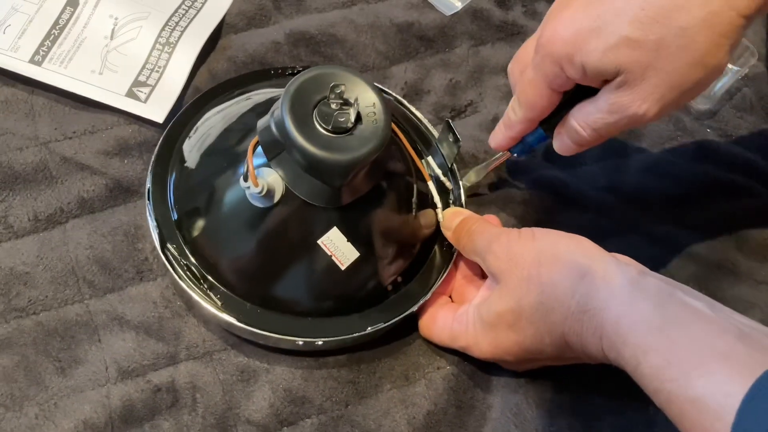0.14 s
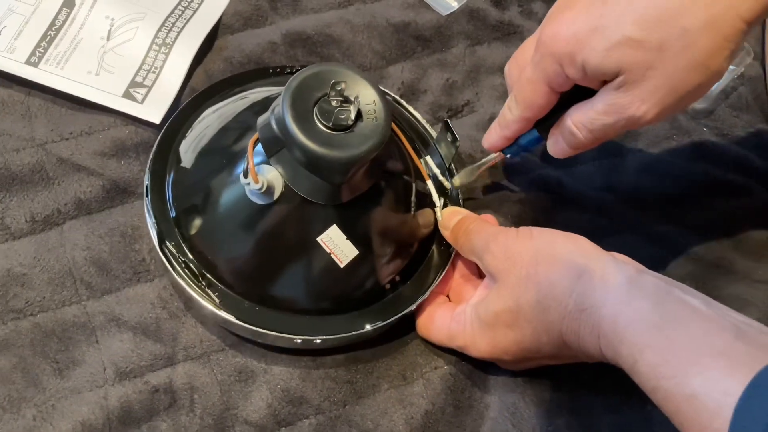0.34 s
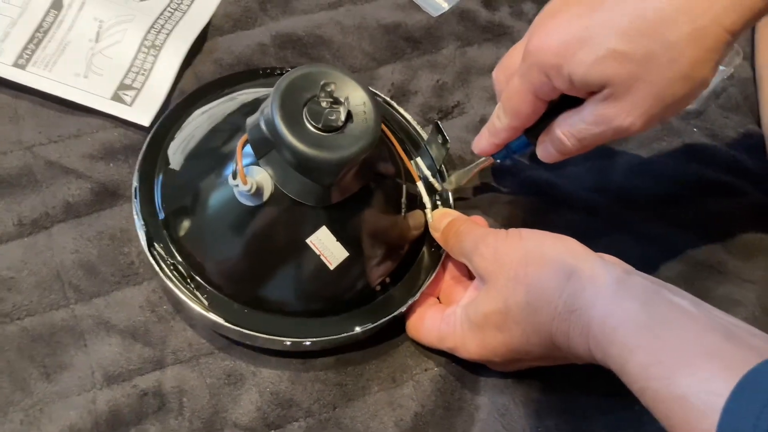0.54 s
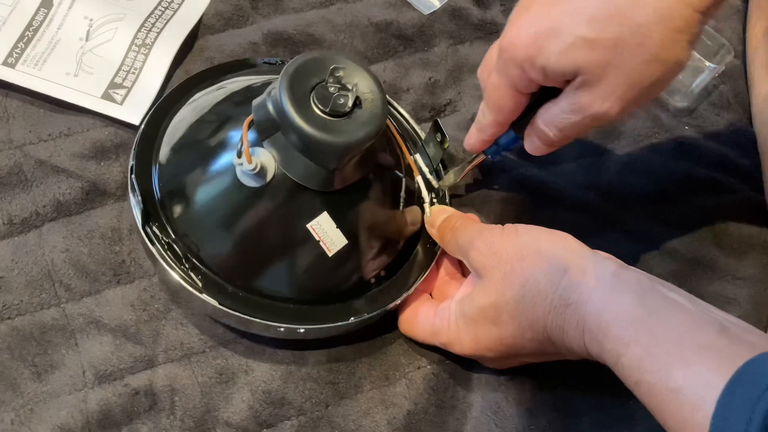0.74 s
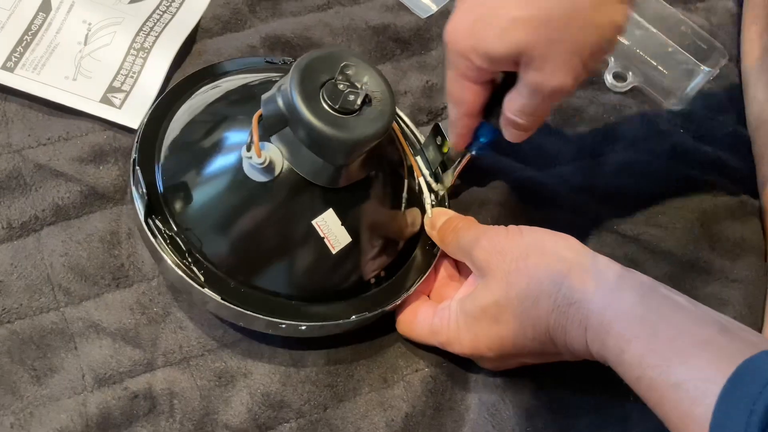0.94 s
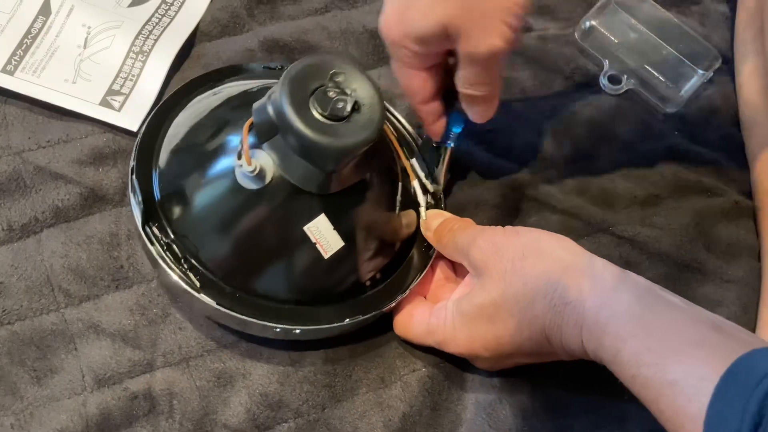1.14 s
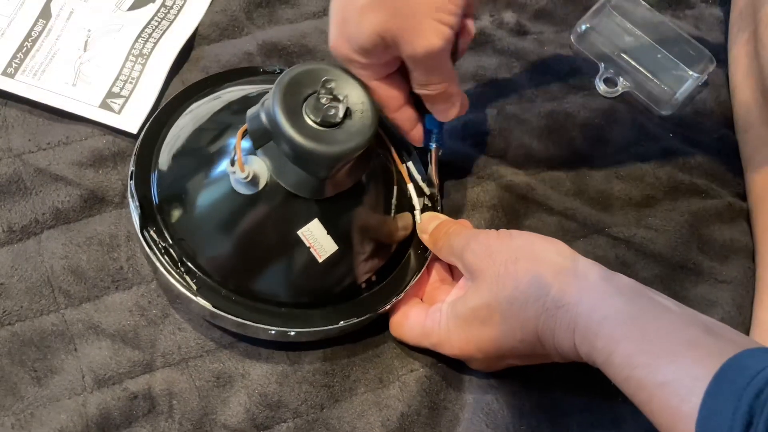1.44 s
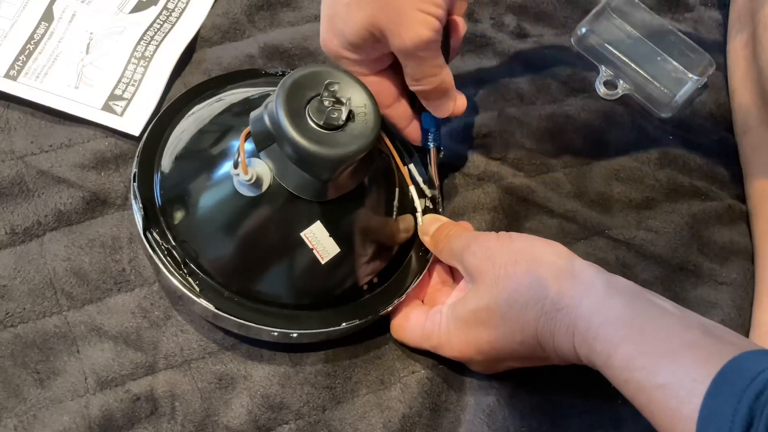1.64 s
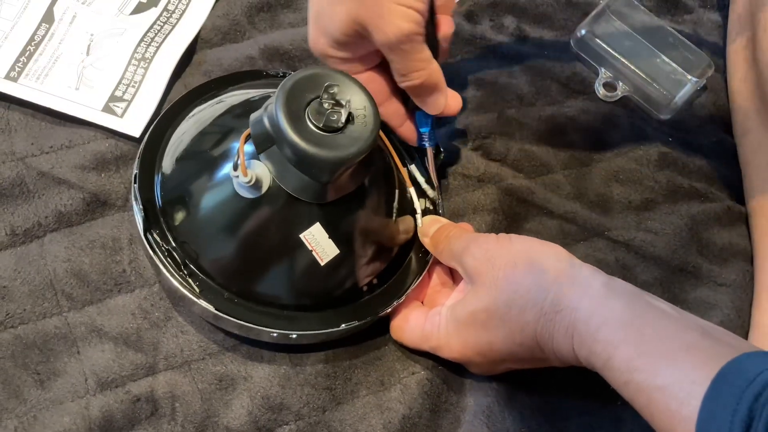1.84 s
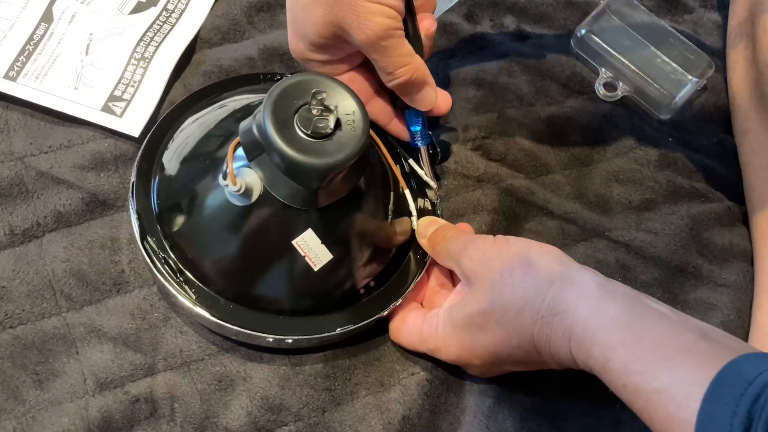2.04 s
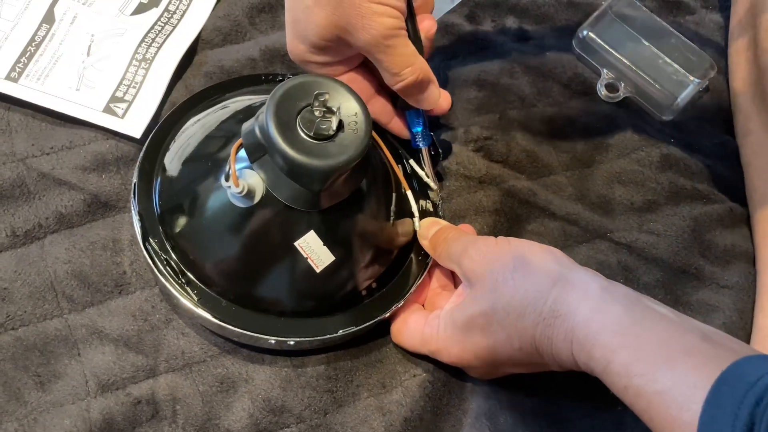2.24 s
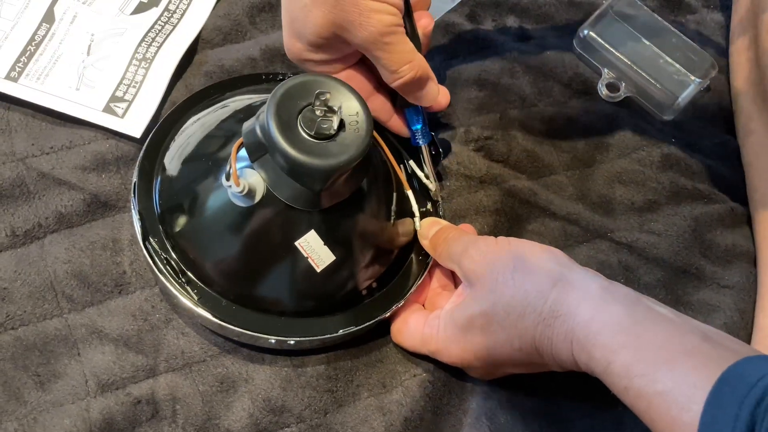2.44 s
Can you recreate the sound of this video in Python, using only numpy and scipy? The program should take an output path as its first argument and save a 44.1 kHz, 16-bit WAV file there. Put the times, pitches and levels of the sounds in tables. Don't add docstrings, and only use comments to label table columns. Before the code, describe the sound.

Thin metal tabs snap and tick under a screwdriver blade, with short gritty scrapes and dull knocks on a blanket; busy first, quieter later, one last weak cluster, heard close in stereo over low indoor hum.

```python
import sys
import numpy as np
from scipy import signal
from scipy.fft import rfft, irfft, next_fast_len
from scipy.io import wavfile
from scipy.ndimage import uniform_filter1d

SR = 44100
rng = np.random.default_rng(int(sys.argv[2]) if len(sys.argv) > 2 else 0)


def unload_audio(sound):
    columns = np.transpose(np.atleast_2d(sound))
    steps = np.round(np.clip(columns, -1, 1) * 32767)
    wavfile.write(sys.argv[1], SR, steps.astype(np.int16))


def gain_from_db(level_db):
    decades = np.asarray(level_db, float) / 20
    return 10 ** decades


N = 114660

# time_s, level_db
HUM_SWELL = [(0.0, -41.5), (0.03, -45), (0.43, -40), (0.51, -50.5), (0.74, -41.5), (0.94, -54),
             (1.1, -39.5), (1.16, -47.5), (1.4, -38.5), (1.59, -55.5), (1.64, -36.5), (1.71, -38.5),
             (1.73, -46.5), (2.03, -36.5), (2.19, -55.5), (2.35, -36.5), (2.45, -52), (2.6, -38.5)]
# pitch_hz, width_hz, level_db
HUM_MODES = [(84.5, 7.8, 2.5), (115.2, 25, -7)]
HUM_LEFT_DB = -1.5
# pitch_hz, level_db
AIR_COLOUR = [(25, -42), (50, -15.5), (160, -18.5), (220, -30), (480, -40), (620, -40), (1500, -50.5),
              (14500, -61.5)]
AIR_DB, AIR_TOP_HZ = -57.5, 15200
# pitch_hz, likeness_0_to_1
PORT_LIKENESS = [(60, .94), (250, .8), (700, .5), (2500, .6), (6300, .3), (8000, .995)]

# time_s, pressure_db
HANDLING = [(0.0, -62), (0.14, -54.5), (0.31, -51), (0.4, -56), (0.68, -60.5), (0.83, -62), (1.14, -56.5),
            (1.29, -66.5), (1.53, -65), (1.91, -59), (2.32, -64.5), (2.54, -61), (2.6, -58)]
# pitch_hz, level_db_per_hz
HANDLING_COLOUR = [(120, -22), (200, -4), (370, 0.5), (480, -1.5), (600, -17.5), (900, -14.5),
                   (1400, -33.5)]
HANDLING_DB, HANDLING_PATCHY_DB = 0, 2.5

# start_s, length_s, pressure_db, grit_treble_db
STROKES = [(0.001, 0.034, -56.5, 0), (0.016, 0.55, -57.5, -28), (0.208, 0.057, -31, -17),
           (0.24, .1, -66, 3), (0.383, 0.072, -43, 3), (0.429, 0.14, -48.5, 0.5), (0.89, 0.23, -39.5, -12),
           (1.008, 0.06, -70, -25), (1.102, .12, -45, -13.5), (1.218, 0.088, -62.5, -2.5),
           (1.557, 0.16, -65.5, -8), (1.693, 0.23, -71.5, -16), (1.841, 0.34, -60.5, -11),
           (2.255, 0.13, -52, -16), (2.287, 0.084, -46, -6), (2.455, 0.23, -53.5, -17.5)]
# pitch_hz, level_db
RUB_COLOUR = [(250, -42), (600, -4.5), (1500, -5), (2400, -1), (3500, -15.5), (4400, -16), (5300, -24),
              (7000, -41)]
# pitch_hz, level_db_per_hz
GRIT_COLOUR = [(3000, -24.5), (5500, -14.5), (8000, 2.5), (12000, -1), (15000, -15), (16500, -23)]
RUB_DB, RUB_PER_S, RUB_SIZE_DB, RUB_PATCHY_DB = -4.5, 6500, -4.5, 2.5
RUB_RING_DB, RUB_WIDTH_HZ = 1, 77

# start_s, length_s, pressure_db
SLIDES = [
    (1.57, 0.18, -60),
    (2.2, 0.2, -68.5),
    (2.2, 0.15, -58.5),
    (0.028, .12, -68),
]
# pitch_hz, level_db_per_hz
SLIDE_COLOUR = [(500, -20), (850, -0.5), (1100, -2.5), (1500, -3), (2000, 0.5), (2400, -11.5),
                (3200, -28.5)]
SLIDE_PATCHY_DB = 1.5

# start_s, level_db, dome_thud_db, treble_crack_db, rim_ping_db
SNAPS = [(0.1669, -24, -5.5, -8.5, -16), (0.2144, -28.5, -4.5, -10, -17), (0.2244, -30.5, -11, -0.5, -7.5),
         (0.2288, -26, -5.5, -8, -13), (0.39, -21, -4, 1, -11.5), (0.4237, -21.5, -4.5, -13.5, -19),
         (0.4305, -12, -9, -0.3, -6), (0.452, -26, -10.5, -2, -9.5), (0.5183, -21, -8.5, -1.5, -2.5),
         (1.0048, -9.5, -5, -15.5, -8), (1.079, -13, -12.5, -3, -8.5), (2.5049, -36.5, -8, -15, -42)]
# loudest_tab_hz, loudest_dome_hz, loudest_rim_hz, build_up_s
SNAP_SPOTS = [(2500, 690, 4800, 0.001), (2100, 820, 3400, .0016), (2320, 756, 3400, .0012),
              (2300, 970, 3980, .0014), (2500, 930, 5150, 0.0017), (2500, 900, 6000, 0.00099),
              (2620, 737, 4170, 0.00038), (2690, 970, 4700, 0.0011), (2704, 1200, 4420, 0.00099),
              (2245, 820, 4350, 0.000767), (2330, 770, 4480, 0.0014), (2040, 1180, 3800, 0.0012)]
# start_s, level_db, treble_crack_db, rim_ping_db, loudest_tab_hz
SLIPS = [(.1735, -32.5, -18, -14, 1990), (0.268, -31.5, -15.5, -13.5, 2378),
         (0.3045, -36.5, -14, -11.5, 2330), (.4185, -32.5, -17, -19.5, 2240),
         (.4212, -30, -16, -16.5, 2350), (.4724, -30.5, -10, -12.5, 2630), (.482, -34, -11.5, -11.5, 2423),
         (0.498, -33, -10.5, -8.5, 2430), (0.5389, -35, -31.5, -5, 2500), (0.9057, -35.5, -7, -6, 2330),
         (0.9183, -28, -7.5, -18, 2460), (0.9304, -24.5, -14.5, -15, 2360), (.942, -27, -11.5, -15.5, 2380),
         (.9445, -32.5, -14, -15.5, 2450), (.9485, -32, -13, -13, 2100), (0.9535, -29.5, -8, -13.5, 2407),
         (.9578, -34.5, -13, -12.5, 2070), (0.9655, -29.5, -13.5, -14, 2140),
         (0.9835, -32, -7.5, -8.5, 2200), (0.9908, -28, -14.5, -3.5, 2390), (0.996, -28.5, -8, -8, 2314),
         (1.0011, -28.5, -13, -14, 2500), (1.1496, -36, -12.5, -10.5, 2270), (1.2524, -43.5, -1, -19, 1980),
         (1.9375, -46.5, -16, -20, 2290), (1.9935, -49, -3.5, -2.5, 2000), (2.001, -54, 1.5, -3, 2100),
         (2.0405, -50, -9.5, -5.5, 2120), (2.281, -42, -16, -17, 1920), (2.3105, -37.5, -20, -15, 2060),
         (2.3184, -33.5, -14, -13, 2500), (2.3231, -31, -19.5, -18, 2070)]
SLIP_THUD_DB, SLIP_RISE_S, SLIP_DOME_HZ, SLIP_RIM_HZ = -5.5, 0.0012, 820, 4300
SLIP_DAMPING_DB_PER_S = 899

# pitch_hz, level_db, fade_60db_s
TAB = [(1400, -10.5, .02), (1656, -10, 0.01), (1852, -4.5, 0.034), (2120, -3.5, 0.027), (2317, 0.5, 0.027),
       (2633, 0, 0.021), (2915, -6.5, 0.03), (3216, -10, .02), (3470, -14, .015)]
# pitch_hz, level_db, fade_60db_s
DOME = [(678, -3, 0.037), (739.4, 2, 0.045), (903, 2, 0.02), (1013, -2.5, .02), (1113.6, -2.5, 0.026),
        (1310, -6.5, 0.015)]
# pitch_hz, level_db, fade_60db_s
RIM = [(3997, 0, 0.017), (4364, -5.5, 0.047), (4790, -4, 0.015), (5410, -11, 0.023), (5950, -1.5, 0.017)]
# pitch_hz, level_db, fade_60db_s
BLADE = [(6250, -4, .012), (7100, -6, 0.012), (7740, -3, .02), (8400, -6, 0.011), (8733, 1.5, 0.022),
         (9730, 0, 0.011)]
# pitch_hz, level_db, fade_60db_s
TIP = [(10740, 0, 0.014), (11570, 1.5, 0.0091), (12570, -3.5, 0.015), (13300, -3, 0.0075),
       (14300, -5.5, .012), (15800, -13.5, .01)]
TIP_DB, TIP_GROWTH = -2.5, 1.6
HITS_DB, RATTLE_S, RISE_S = -6.5, 0.0004, 0.00037
CLUSTER, DETUNE, SPREAD_DB = 6, 0.044, 5.5
FOCUS_OCTAVES, FOCUS_DB = 0.17, 8
CLICK_SIZE = 2000

# start_s, level_db
KNOCKS = [
    (.226, -41.5),
    (0.391, -40.5),
    (0.433, -40.5),
    (.52, -52.5),
    (1.006, -39.5),
    (1.082, -34),
    (2.505, -46.5),
]
# pitch_hz, level_db, fade_60db_s
KNOCK_MODES = [(220, -4, .04), (300, -8.5, 0.025), (360, -0.5, 0.07), (440, -0.5, 0.039)]

# pitch_hz, fade_60db_s
ROOM_FADE = [(300, 0.38), (1000, 0.22), (2500, 0.21), (6000, 0.2), (14000, 0.081)]
ROOM_DB, WIDE_DB, WIDE_TOP_HZ = -15.5, 1, 4060
SCATTER_DB, SCATTER_T60_S, SCATTER_HZ = -2, 0.018, (950, 6000)

# pitch_hz, turn_radians
PORT_TURN = [(400, .3), (600, -1.3), (1100, -1.6), (1900, 1.9), (2700, -1.2), (4500, -.6), (6150, 3.14),
             (16500, 21.7)]
# pitch_hz, difference_db
PORT_TILT = [(300, 0.83), (800, -0.5), (1300, -2), (1700, -6.5), (2200, -5.5), (3000, -1.5), (5200, -1),
             (6000, -0.5)]
PORT_TOP_HZ = 16350
LEFT_RIGHT = np.array([[1], [-1]])


def evened(x):
    return x / np.sqrt(np.mean(x ** 2) + 1e-20)


def read(points, hz):
    f, value = np.transpose(points)
    return np.interp(np.log(hz + 1), np.log(f + 1), value)


def curve(points):
    s, level = np.transpose(points)
    return gain_from_db(np.interp(np.arange(N) / SR, s, level))


def shape(x, gain):
    size = next_fast_len(N + 4096)
    return irfft(rfft(x, size) * gain(np.fft.rfftfreq(size, 1 / SR)), size)[..., :N]


def peak(f, hz, width_hz):
    return 1 / (1 + (2 * (f - hz) / width_hz) ** 2)


def pair(gain):
    a, b = rng.standard_normal((2, N))

    def same(f):
        return np.clip(read(PORT_LIKENESS, f), 0, 1)

    left = shape(a, gain)
    shared = shape(a, lambda f: gain(f) * same(f))
    own = shape(b, lambda f: gain(f) * np.sqrt(1 - same(f) ** 2))
    return np.array([left, shared + own])


def patchy(x, db):
    z = signal.stft(x, nperseg=1024)[2]
    field = rng.standard_normal(z.shape[-2:])
    field = uniform_filter1d(field, size=3, axis=0)
    field = uniform_filter1d(field, size=4, axis=1)
    return evened(signal.istft(z * gain_from_db(db * evened(field)), nperseg=1024)[1][..., :N])


def arches(s, length, db, skew):
    t = np.arange(N) / SR
    progress = np.clip((t - s) / length, 0, 1)
    return gain_from_db(db) * np.sin(np.pi * progress ** skew) ** 2


def hum():
    noise = pair(lambda f: sum(gain_from_db(db) * peak(f, hz, width) for hz, width, db in HUM_MODES))
    return gain_from_db(HUM_LEFT_DB * LEFT_RIGHT) * curve(HUM_SWELL) * evened(noise)


def air():
    x = pair(lambda f: gain_from_db(read(AIR_COLOUR, f)) / (1 + (f / AIR_TOP_HZ) ** 90))
    return gain_from_db(AIR_DB) * x / np.std(shape(x, lambda f: f > 150))


def handling():
    rustle = pair(lambda f: gain_from_db(read(HANDLING_COLOUR, f)))
    return gain_from_db(HANDLING_DB) * curve(HANDLING) * patchy(rustle, HANDLING_PATCHY_DB)


def rubbing():
    s, length, db, treble_db = np.transpose(STROKES)[:, :, None]
    arch = arches(s, length, db, 0.64)
    grit = rng.standard_normal(N) * gain_from_db(RUB_SIZE_DB * np.minimum(rng.exponential(1, N), 4))
    grit *= rng.random(N) < RUB_PER_S / SR
    body = evened(shape(grit, lambda f: gain_from_db(read(RUB_COLOUR, f))))
    fizz = evened(shape(grit, lambda f: gain_from_db(read(GRIT_COLOUR, f))))

    def metal(f):
        return 1 + gain_from_db(RUB_RING_DB) * sum(peak(f, hz, RUB_WIDTH_HZ) for hz, *_ in TAB + DOME + RIM)

    body = patchy(shape(body, metal), RUB_PATCHY_DB)
    return gain_from_db(RUB_DB) * (arch.sum(0) * body + (arch * gain_from_db(treble_db)).sum(0) * fizz)


def sliding():
    s, length, db = np.transpose(SLIDES)[:, :, None]
    friction = shape(rng.standard_normal(N), lambda f: gain_from_db(read(SLIDE_COLOUR, f)))
    return arches(s, length, db, 0.6).sum(0) * patchy(friction, SLIDE_PATCHY_DB)


def ring(modes, rise_s=RISE_S, spot_hz=None, size=CLICK_SIZE):
    t = np.arange(size) / SR
    hz, db, t60 = np.repeat(modes, CLUSTER, axis=0).T[:, :, None]
    loudness, detune, phase = rng.uniform(-0.82, 1, (3, len(hz), 1))
    hz = hz * (1 + DETUNE * detune)
    if spot_hz:
        db = db + FOCUS_DB * np.exp(-(np.log2(hz / spot_hz) / FOCUS_OCTAVES) ** 2)
    fading = gain_from_db(db + SPREAD_DB * loudness - 60 * t / t60)
    wave = (fading * np.sin(2 * np.pi * hz * t + np.pi * phase)).sum(0)
    wave *= 1 - np.exp(-(t / rise_s) ** 2)
    return wave / np.sqrt(np.mean(wave[:250] ** 2))


def click(db, thud_db, crack_db, ping_db, rise_s, tab_hz, dome_hz, rim_hz):
    rough = uniform_filter1d(rng.standard_normal(size=CLICK_SIZE), int(RATTLE_S * SR) + 1)
    rattle = gain_from_db(2.4 * evened(rough))
    sound = ring(TAB, rise_s, tab_hz)
    sound += gain_from_db(thud_db) * ring(DOME, rise_s, dome_hz)
    sound += gain_from_db(ping_db) * ring(RIM, rise_s, rim_hz)
    sound += gain_from_db(crack_db) * ring(BLADE, rise_s)
    sound += gain_from_db(TIP_DB + TIP_GROWTH * crack_db) * ring(TIP, rise_s)
    return gain_from_db(db + HITS_DB) * rattle * sound


def prying():
    out = np.zeros(N + 5000)
    mute = gain_from_db(-SLIP_DAMPING_DB_PER_S * np.arange(CLICK_SIZE) / SR)
    for (s, db, thud_db, crack_db, ping_db), (*spot, rise_s) in zip(SNAPS, SNAP_SPOTS):
        snap = click(db, thud_db, crack_db, ping_db, rise_s, *spot)
        out[round(s * SR):][:CLICK_SIZE] += snap
    for s, db, crack_db, ping_db, tab_hz in SLIPS:
        slip = click(db, SLIP_THUD_DB, crack_db, ping_db, SLIP_RISE_S, tab_hz, SLIP_DOME_HZ, SLIP_RIM_HZ)
        out[round(s * SR):][:CLICK_SIZE] += mute * slip
    return out[:N]


def scatter(x):
    t = np.arange(1500) / SR
    low, high = SCATTER_HZ
    taps = rng.standard_normal(len(t)) * gain_from_db(-60 * t / SCATTER_T60_S)
    wide = signal.oaconvolve(x, taps / np.linalg.norm(taps))[:N]
    wide = shape(wide, lambda f: 1 / (1 + (f / high) ** 4) / (1 + (low / (f + 1)) ** 4))
    return gain_from_db(SCATTER_DB) * wide * LEFT_RIGHT


def room(x):
    hz, t, z = signal.stft(rng.standard_normal((2, SR // 2)), SR, nperseg=128)
    fading = gain_from_db(-60 * t / read(ROOM_FADE, hz)[:, None])
    tail = signal.istft(z * fading, SR, nperseg=128)[1]
    tail *= np.clip(np.arange(tail.shape[1]) / SR / 0.002, 0, 1)
    middle, side = signal.fftconvolve(x[None], tail / np.linalg.norm(tail[0]), axes=1)[:, :N]
    side = gain_from_db(WIDE_DB) * shape(side, lambda f: 1 / (1 + (f / WIDE_TOP_HZ) ** 4))
    return gain_from_db(ROOM_DB) * (middle + side * LEFT_RIGHT)


def knocks():
    out = np.zeros(N + 5000)
    for s, db in KNOCKS:
        out[round(s * SR):][:3000] += gain_from_db(db) * ring(KNOCK_MODES, size=3000)
    return out[:N]


def scene():
    work = rubbing() + sliding() + prying()
    work = shape(work, lambda f: 1 / (1 + (520 / (f + 1)) ** 6))
    work = work + knocks()
    return hum() + air() + handling() + work + scatter(work) + room(work)


def band_limit(x):
    return signal.sosfilt(signal.butter(12, 16780, fs=SR, output="sos"), x)


def record(dry):
    side = LEFT_RIGHT / 2

    def ports(f):
        level = gain_from_db(side * read(PORT_TILT, f))
        turn = np.exp(1j * side * np.interp(f, *np.transpose(PORT_TURN)))
        return level * turn / (1 + (f / PORT_TOP_HZ) ** 60)

    return band_limit(shape(dry, ports))


dry = scene()
out = record(dry)
unload_audio(out)
```